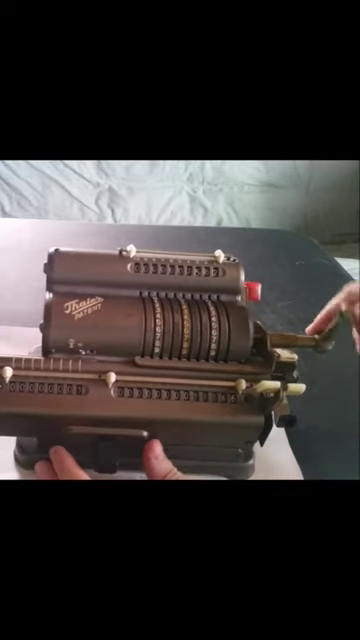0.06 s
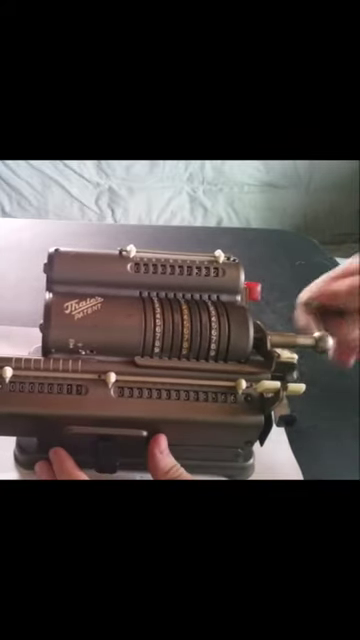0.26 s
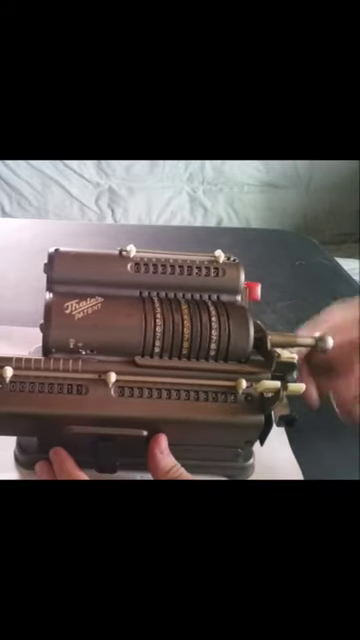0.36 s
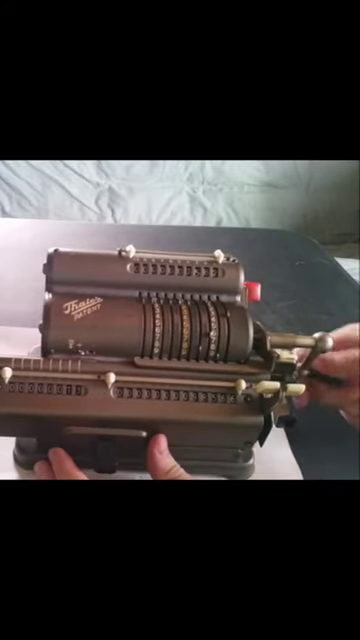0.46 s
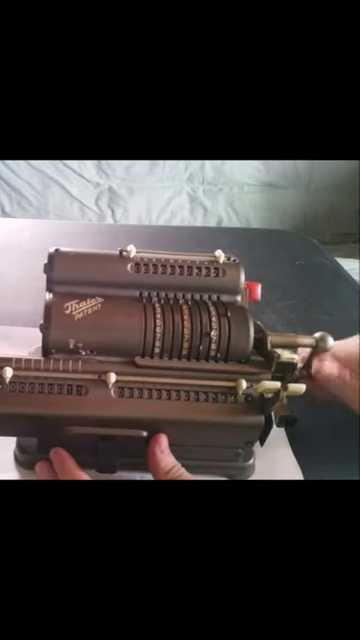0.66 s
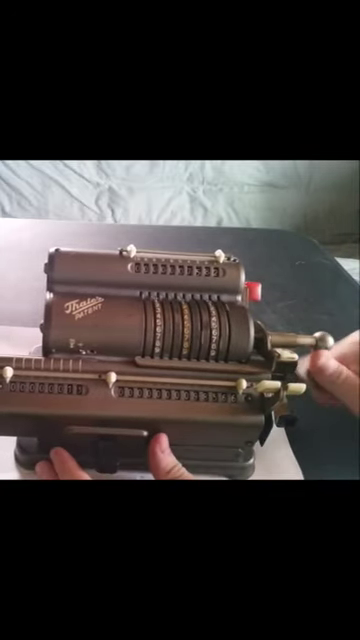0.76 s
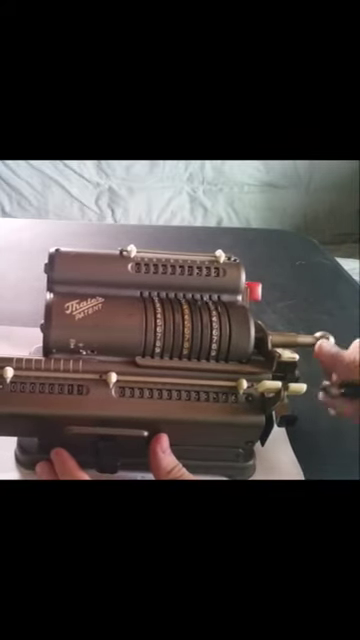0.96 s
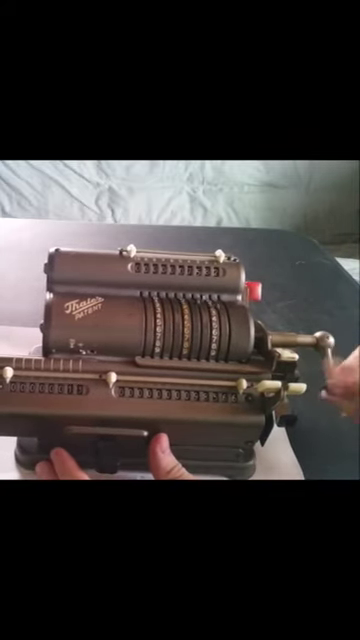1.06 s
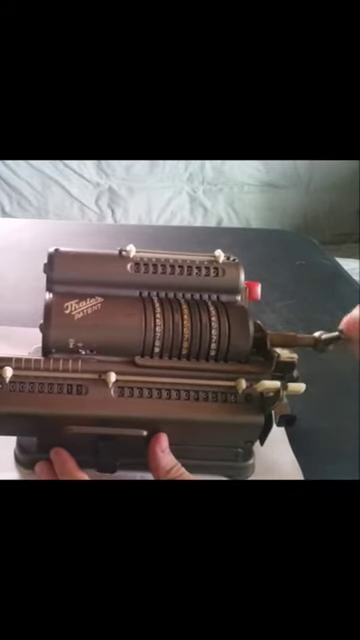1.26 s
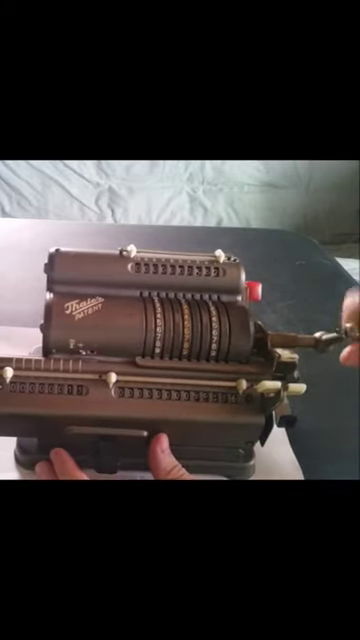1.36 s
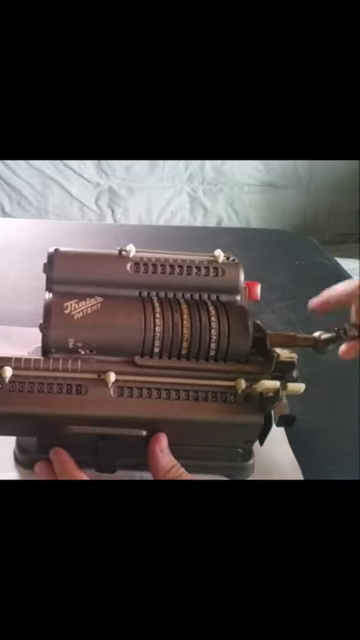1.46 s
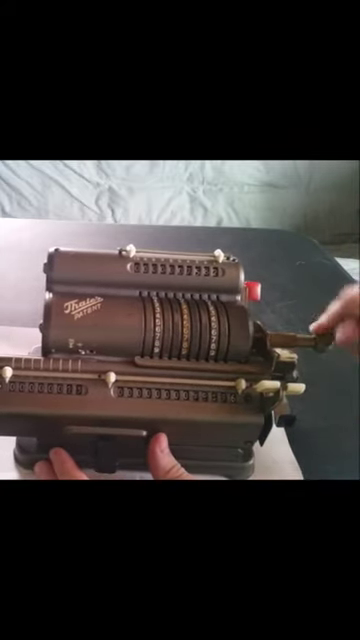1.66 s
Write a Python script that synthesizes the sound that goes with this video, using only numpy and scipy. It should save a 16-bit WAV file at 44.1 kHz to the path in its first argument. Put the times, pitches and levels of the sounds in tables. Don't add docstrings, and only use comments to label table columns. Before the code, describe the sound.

Crank turned on a mechanical calculator: dense bright ratcheting, one heavy clunk, then light clicks

```python
import sys
import numpy as np
from scipy import signal
from scipy.fft import rfft, irfft, next_fast_len
from scipy.io import wavfile
from scipy.ndimage import uniform_filter1d, map_coordinates

SR = 44100
rng = np.random.default_rng(int(sys.argv[2]) if len(sys.argv) > 2 else 0)


def to_linear_factor(level_db):
    exponent = np.asarray(level_db, float) / 20
    return 10 ** exponent


def unload_audio(sound):
    columns = np.transpose(np.atleast_2d(sound))
    steps = np.round(np.clip(columns, -1, 1) * 32767)
    wavfile.write(sys.argv[1], SR, steps.astype(np.int16))


N = 74970

# f/Hz, density/dB per Hz
AIR_COLOUR = [(15, -46), (25, -11.5), (102, 0.5), (476, -8), (641, -8.5), (988, -8.5), (1400, -25.5),
              (6380, -29), (16000, -75)]
# t/s, peak level/dB, base boom level/dB, cover boom level/dB, strongest
# f/Hz
KNOCKS = [(.047, -52, -60, -58, 750), (.0895, -34.5, -59, -43, 906), (.110, -38, -62, -47.5, 905),
          (.139, -36.5, -44.5, -61, 790), (.199, -27.5, -42, -39.5, 813), (.237, -26, -38, -54, 770),
          (.247, -25.5, -33, -32, 901), (.265, -28, -41, -38.5, 730), (.301, -31.5, -54, -54, 747),
          (.331, -29, -48, -41, 1003), (.36, -23, -36.5, -28, 760), (.377, -26, -38, -30, 726),
          (.442, -30, -51, -44, 763), (.451, -27, -57, -42, 798), (.527, -30.5, -52, -40, 790),
          (.554, -29, -40, -39, 752), (.582, -9.5, -45, -24.5, 979), (.591, -20.5, -35, -29, 1004),
          (.660, -42, -42.5, -43, 1010),
          (0.846, -40.5, -47, -46, 903), (.935, -40, -66, -52, 985), (.946, -31, -37.5, -43, 1010),
                (.967, -32.5, -40, -41.5, 983), (.982, -42, -48, -54, 700), (1.150, -40.5, -72, -78, 778),
                (1.279, -47, -63, -70, 860), (1.336, -39.5, -51, -43, 608), (1.411, -27, -51, -32, 766),
                (1.416, -29.5, -42, -41, 1226), (1.514, -43, -70, -67, 1150),
                (1.537, -39, -72, -48.5, 1310), (1.644, -51.5, -64, -52, 687),
          (.189, -35, -43, -39.5, 782), (.208, -33.5, -49, -50, 1007), (.258, -39, -37, -56, 700),
                (.276, -31, -43, -59, 1050), (.312, -37, -49, -48, 764), (.338, -26, -44, -37, 830),
                (.392, -32, -45, -43, 890), (.408, -31, -53, -46, 790), (.499, -36, -47, -55, 752),
                (.536, -29.5, -55, -51, 1008), (.572, -32, -40, -52, 814), (.603, -26.5, -39, -32, 1100),
                (.622, -38, -41, -40, 806), (.692, -46, -44, -44, 1000), (1.365, -37.5, -62, -47, 600),
                (1.385, -38, -66, -43, 694), (1.397, -36.5, -60, -48, 656), (1.434, -35, -45.5, -35.5, 794),
                (1.552, -42.5, -67, -49, 1000), (1.24, -51, -60, -57, 870)]
# f/Hz, level/dB, t60/s
BOOM_MODES = [(177, -2.5, 0.22), (207.8, 1.5, 0.19), (332.3, 0.5, 0.12), (457.5, -5, 0.095)]
# f/Hz, level/dB, t60/s
SHELL_MODES = [(692, -1, 0.046), (755.7, -4, 0.17), (813, 0.5, 0.045), (905, -4, 0.11), (975, 0.5, 0.079),
               (1637, -13.5, 0.14), (1071, 0.5, 0.07), (1109, -10.5, 0.048), (1180, -7.5, 0.059),
               (1506, -7.5, 0.29), (1565, -7, 0.069)]
SEATINGS = [
    0.314,
    .414,
    0.469,
    .792,
    1.449,
]
# t/s, scrape level/dB, rumble level/dB
DRUM_DRAG = [(0, -92, -77), (.085, -86, -61), (.12, -68, -52.5), (0.179, -59.5, -45.5), (.24, -42, -39.5),
             (0.388, -40, -35.5), (0.424, -49.5, -45), (.52, -53.5, -43.5), (0.599, -66, -36),
             (.72, -68, -56.5), (0.921, -89.5, -60.5), (0.963, -48.5, -42.5), (1.05, -72.5, -56.5),
             (1.325, -84, -66.5), (1.344, -76, -56), (1.4, -64, -47.5), (1.48, -71, -54.5),
             (1.7, -84.5, -64.5)]
# t/s, peak level/dB, rattle t60/s, top-octave level/dB
TICKS = [(0.1879, -25, 0.031, -25), (0.2, -23.5, 0.031, 4.5), (0.2328, -24.5, 0.035, 5),
         (0.2444, -24.5, 0.03, 10.5), (0.27, -16.5, 0.015, 3), (0.2983, -26.5, 0.068, 8),
         (0.3272, -19.5, 0.015, 9.5), (0.3565, -22, 0.012, 15.5), (0.3738, -20.5, 0.016, 7.5),
         (0.4602, -18, 0.03, 3), (0.5513, -26, 0.093, 7), (0.58, -18.5, 0.041, -4.5),
         (0.944, -25, 0.036, -2), (0.974, -34.5, 0.055, -19), (1.1003, -42.5, 0.014, -27),
         (1.1498, -39.5, 0.027, -19), (1.35, -44, 0.019, -11),
         (0.1061, -34, 0.0063, -12),
    (0.109, -23, 0.012, -38),
    (0.54, -31.5, 0.039, 6),
    (1.409, -38, 0.11, 3.5),
    (1.426, -36, 0.07, -0.5),
    (1.537, -44, 0.053, -21),
         (0.19, -28, .015, -8), (.2035, -34, 0.014, 1), (.238, -25, 0.013, 2), (.304, -23, .015, 5),
               (.332, -25.5, 0.023, 4), (.379, -22, 0.013, 9), (.391, -25, 0.018, 6),
               (0.4375, -28, 0.021, 8), (.478, -26, 0.02, 0), (1.362, -42, 0.026, -10),
               (1.383, -38, .015, -9), (1.398, -40.5, 0.039, -16), (1.13, -49, 0.022, -15)]
# f/Hz, width/Hz, level/dB
PIN_MODES = [(4610, 280, 1), (5144, 210, 15.5), (5200, 34, -16), (6100, 30, -21), (7330, 970, 9.5),
             (9600, 600, -27), (11660, 800, 0)]
# f/Hz, density/dB per Hz
STEEL_COLOUR = [(760, -57), (1300, -10), (1620, 0), (1780, -4), (3760, -10.5), (5420, -3), (8610, -12),
                (14700, -9.5), (16000, -17)]
# t/s, f/Hz, level/dB, t60/s
RINGING_NOTES = [(.62, 1007, -44, 0.97), (1.150, 758, -35.5, 0.098), (1.150, 4576, -44.5, 0.053),
                 (.328, 4000, -30.5, 0.055), (0.37, 4200, -35, .04), (.354, 4100, -30, 0.053),
                 (.461, 6000, -33, .04), (0.22, 1800, -43, .15), (.3, 1600, -40, .1),
                 (1.645, 1090, -55, 0.19), (.582, 1120, -20, 0.064), (.582, 1000, -20.5, 0.064),
                 (.966, 2030, -43.5, 0.16), (.966, 320, -35.5, 0.11), (1.54, 1800, -50, 0.11),
                 (.448, 191.7, -25, 0.31), (1.28, 860, -49, 0.028)]
# f/Hz, t60/s
ROOM_DECAY = [(200, 0.34), (2000, 0.14), (10000, 0.25)]
# f/Hz, correlation [-1 to 1]
STEREO_LIKENESS = [(60, 0.74), (180, 0.91), (550, 0.89), (1650, 0.59), (4970, -0.26), (15000, 0.012)]
# f/Hz, left minus right level/dB
PORT_TILT = [(60, -2), (400, 2), (1000, 5.5), (3000, 2), (4500, 12), (7800, 16.5), (9300, -2.5),
             (15000, -5.5)]

KNOCKS_ALL = KNOCKS
PUSH_S, HEAVE_S = 0.0013, 0.004


def unit(x):
    return x / np.sqrt(np.mean(x ** 2) + 1e-20)


def along(points, hz):
    f, v = np.transpose(points)
    return np.interp(np.log(hz + 1), np.log(f + 1), v)


def wobble(rate):
    knots = rng.standard_normal(int(N * rate / SR) + 4)
    return map_coordinates(knots, [np.arange(N) * rate / SR])


def filtered(x, response):
    m = next_fast_len(N + SR // 2)
    spectrum = rfft(x, m) * response(np.fft.rfftfreq(m, 1 / SR))
    return irfft(spectrum, m)[..., :N]


def peaks(f, rows):
    total = 0
    for k, (centre, width, db) in enumerate(rows):
        damping = 1j * f * width
        total = total + (-1) ** k * to_linear_factor(db) * damping / (centre ** 2 - f ** 2 + damping)
    return total


def grit(rate, spread_db):
    touching = rng.random(N) < rate / SR
    size = to_linear_factor(spread_db * np.minimum(rng.exponential(size=N), 4))
    return unit(touching * size * rng.standard_normal((2, N)))


def patchy(x, patchy_db):
    z = signal.stft(x, nperseg=128)[2]
    field = uniform_filter1d(rng.standard_normal(z.shape[1:]), size=4, axis=0)
    field = unit(uniform_filter1d(field, size=3, axis=1))
    return unit(signal.istft(z * to_linear_factor(patchy_db * field), nperseg=128)[1][:, :N])


def drag_db(axis):
    rows = np.transpose(DRUM_DRAG)
    return np.interp(np.arange(N) / SR, rows[0], rows[axis])


def choked(s, t):
    choke_t60_s = 0.027
    stop = min([c for c in SEATINGS if c > s] + [9])
    return to_linear_factor(-60 * np.clip(s + t - stop, 0, None) / choke_t60_s)


def room_tone():
    hum_hz, hum_db, air_db = 90, -60, -55.5
    wake_s, wake_db = 0.092, -3
    t = np.arange(N) / SR
    air = unit(filtered(rng.standard_normal((2, N)), lambda f: to_linear_factor(along(AIR_COLOUR, f))))
    hum = np.sin(2 * np.pi * hum_hz * t + 0.2 * wobble(12)) * to_linear_factor(hum_db + 4.9 * wobble(9.07))
    waking_db = wake_db * np.clip(1.5 - 1.6 * t / wake_s, 0, 1)
    return to_linear_factor(air_db + 1.8 * wobble(4.91) + waking_db) * air + hum * [[1], [0]]


def drum_rumble():
    modes = [(hz, 1.2 / t60 + 15, db) for hz, db, t60 in BOOM_MODES + SHELL_MODES]
    jolts = grit(1200, spread_db=2) * to_linear_factor(1.2 * wobble(40))
    rumble = unit(filtered(jolts, lambda f: peaks(f, modes) + 0.13 / (1 + (f / 1800) ** 2)))
    return to_linear_factor(drag_db(axis=2)) * rumble


def body_knocks():
    focus_hz, focus_db = 123, 9.5
    snap, snap_s = 1.13, 0.0081
    part_db, part_t60_s = -3.5, 0.068
    out, t = np.zeros((2, N + SR)), np.arange(SR // 3) / SR
    hz, level, t60 = np.array(BOOM_MODES + SHELL_MODES).T[..., None]
    shell_swing = 1 + snap * np.exp(-t / snap_s)
    boom_swing = 1 - np.exp(-(t / HEAVE_S) ** 2)
    swing = np.where(hz > 550, shell_swing, boom_swing)
    chance = rng.standard_normal((len(KNOCKS_ALL), 2, 3, len(hz), 1))
    for (s, db, base_db, cover_db, focus), draw in zip(KNOCKS_ALL, chance):
        shell_db = db - 19 + focus_db * np.exp(-((hz - focus) / focus_hz) ** 2)
        upper_db = np.where(hz < 550, cover_db + 0.5, shell_db)
        start_db = level + np.where(hz < 270, base_db + 0.5, upper_db)
        onset = (1 - np.exp(-t / PUSH_S)) * choked(s, t)
        for side, (uneven, turned, detuned) in enumerate(draw):
            phase = 2 * np.pi * hz * (1 + 0.0033 * detuned) * t + 1.23 * turned + side * 20 * detuned
            ring = to_linear_factor(start_db + 2.3 * uneven - 60 * t / t60) * np.sin(phase) * swing
            part = np.sin(2 * np.pi * focus * t + side * np.pi / 2) * 0.31 ** side
            part = part * to_linear_factor(db + part_db - 60 * t / part_t60_s)
            out[side, round(s * SR):][:len(t)] += (ring.sum(axis=0) + part) * onset
    return out[:, :N]


def loose_parts():
    crunch_db, crunch_t60_s = -15, 0.21
    shaken, t = np.zeros(N + SR), np.arange(SR // 3) / SR
    for s, db, *_ in KNOCKS_ALL:
        shake = to_linear_factor(db + crunch_db - 60 * t / crunch_t60_s) * (1 - np.exp(-t / PUSH_S))
        shaken[round(s * SR):][:len(t)] += shake
    crunch = shaken[:N] * grit(2400, spread_db=2)
    return filtered(crunch, lambda f: peaks(f, [(1830, 1660, 0)]) ** 2)


def steel():
    power, t = np.zeros((3, N + SR)), np.arange(SR // 4) / SR
    for s, db, t60, top_db in TICKS:
        burst = to_linear_factor(2 * (db - 6 - 60 * t / max(t60, 0.003))) * (1 - np.exp(-t / 0.00091))
        power[:, round(s * SR):][:, :len(t)] += burst * to_linear_factor([[0], [2 * top_db], [-0.4 * top_db]])
    scrape_db = drag_db(axis=1) + 0.7 * wobble(60.3) + [[0], [-0.3], [-0.3]]
    env = np.sqrt(power[:, :N] + to_linear_factor(1.832 * scrape_db))
    contacts = rng.standard_normal((2, N)) + 0.11 * grit(6000, spread_db=6.0)
    contacts = patchy(contacts, patchy_db=4.0)

    def colour(f):
        return to_linear_factor(along([(700, -57)] + STEEL_COLOUR, f)) * (1 + 0.38 * peaks(f, PIN_MODES))

    def top(f):
        return 1 / (1 + (8600 / (f + 1)) ** 12)

    def low(f):
        return 1 / (1 + (f / 4300) ** 8)

    middle_band = filtered(env[0] * contacts, lambda f: colour(f) * (1 - top(f) - low(f)))
    top_band = filtered(env[1] * contacts, lambda f: colour(f) * top(f))
    low_band = filtered(env[2] * contacts, lambda f: colour(f) * low(f))
    return (middle_band + low_band + top_band) / np.std(filtered(contacts, colour))


def levers():
    out, t = np.zeros((2, N + SR)), np.arange(SR // 3) / SR
    for s, hz, db, t60 in RINGING_NOTES:
        note = np.sin(2 * np.pi * hz * t + np.array([[0], [np.pi / 2]])) * [[1], [0.4]]
        note = note * (1 - np.exp(-t / PUSH_S)) * to_linear_factor(db - 60 * t / t60)
        out[:, round(s * SR):][:, :len(t)] += note * choked(s, t)
    return out[:, :N]


def room(x):
    hz, t, z = signal.stft(rng.standard_normal((2, SR // 2)), SR, nperseg=256)
    decay = to_linear_factor(-60 * t / along(ROOM_DECAY, hz)[:, None])
    tail = signal.istft(z * decay, SR, nperseg=256)[1]
    tail = tail / np.linalg.norm(tail[0])
    return signal.fftconvolve(np.pad(x, ((0, 0), (200, 0))), tail, axes=1)[:, :N]


def scene():
    room_db, near_db = -3, -9
    bright = steel()
    heavy = body_knocks() + loose_parts() + drum_rumble() + levers()
    echo = to_linear_factor(room_db) * room(bright + to_linear_factor(near_db) * heavy)
    pair = bright + heavy + echo + room_tone()

    def spread(f):
        angle = np.arccos(np.clip(along(STEREO_LIKENESS, f), -1, 1)) / 2
        return np.array([np.cos(angle), np.sin(angle)])

    mid, side = filtered(pair, spread)
    return np.array([mid + side, mid - side])


def low_pass(x):
    return signal.sosfilt(signal.butter(12, 16650, fs=SR, output="sos"), x)


def record(dry):
    top_hz = 15800

    def ports(f):
        tilt_db = along(PORT_TILT, f)
        band_limit = 1 / (1 + (f / top_hz) ** 150)
        return to_linear_factor(tilt_db * [[0.5], [-0.5]]) * band_limit / np.cosh(tilt_db / 17)

    mix = filtered(dry, ports)
    return low_pass(mix)


dry = scene()
out = record(dry)
unload_audio(out)
```